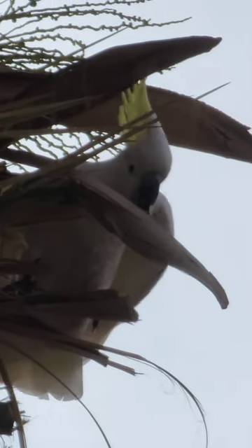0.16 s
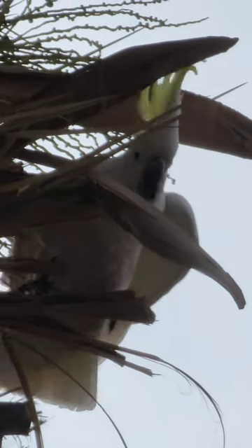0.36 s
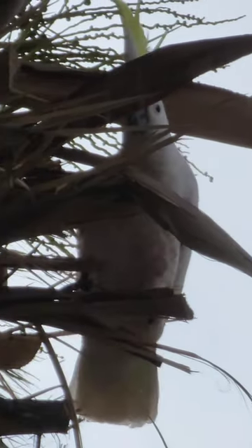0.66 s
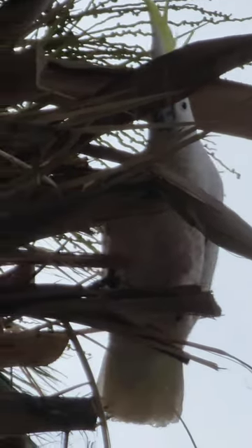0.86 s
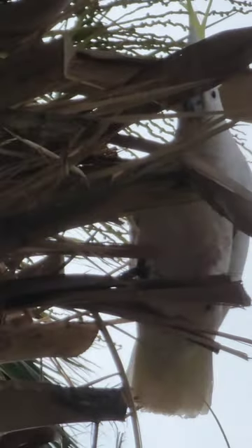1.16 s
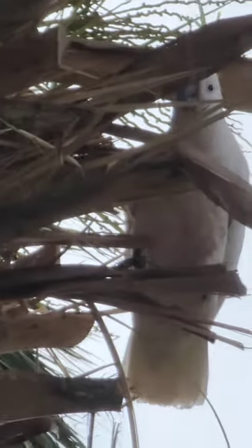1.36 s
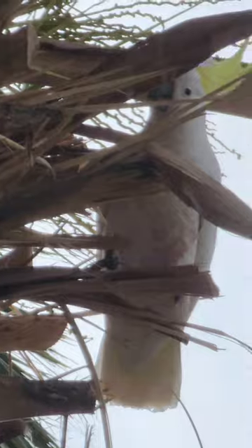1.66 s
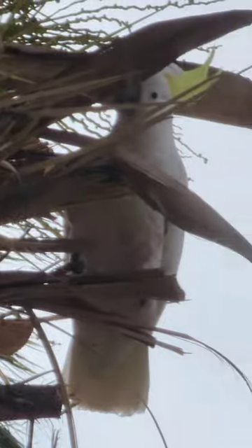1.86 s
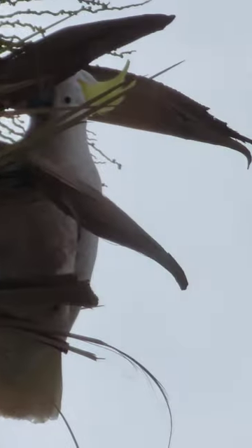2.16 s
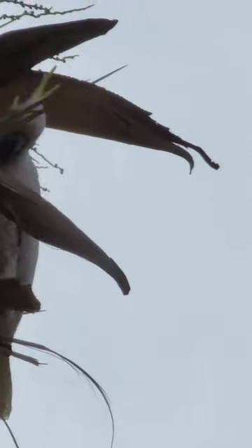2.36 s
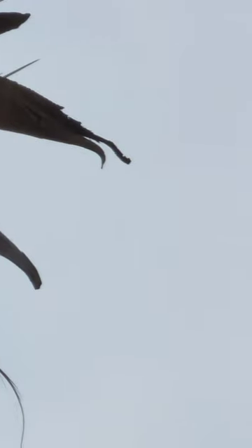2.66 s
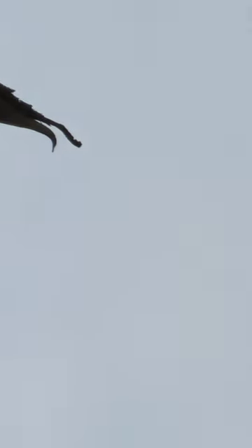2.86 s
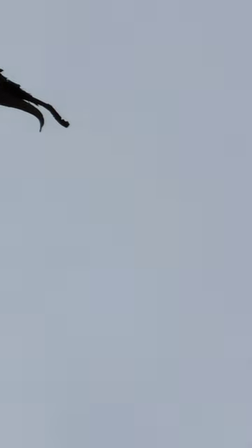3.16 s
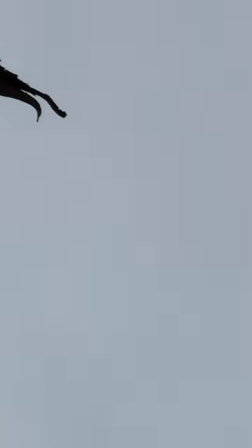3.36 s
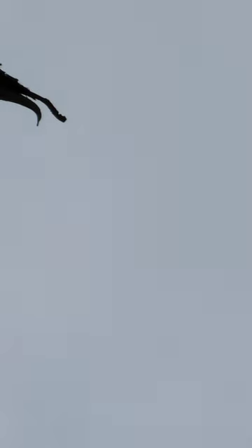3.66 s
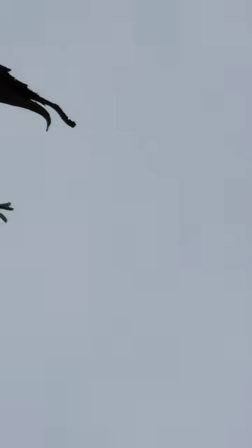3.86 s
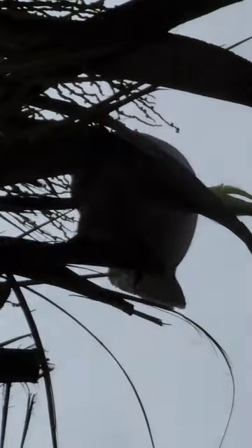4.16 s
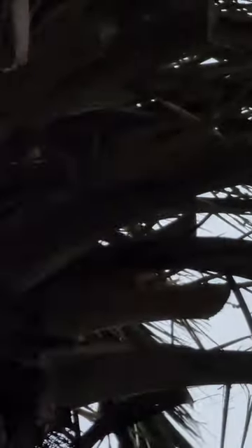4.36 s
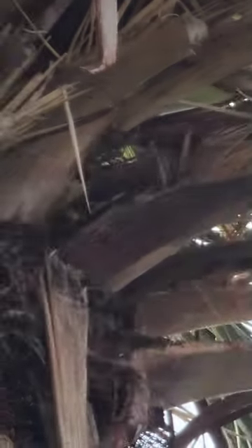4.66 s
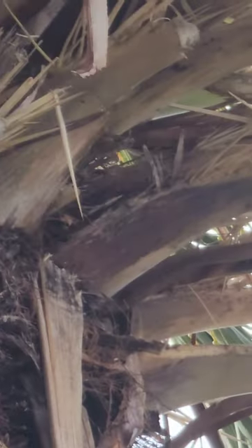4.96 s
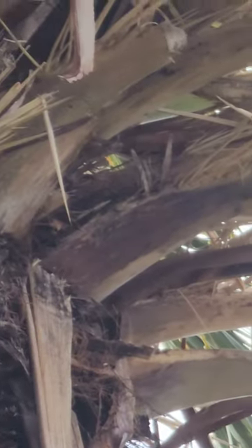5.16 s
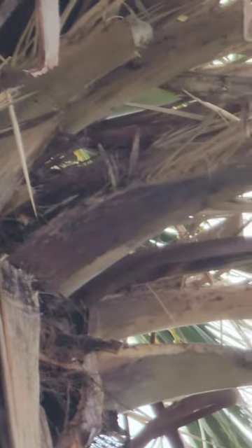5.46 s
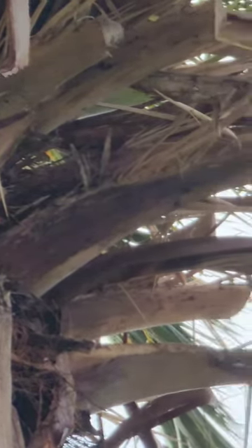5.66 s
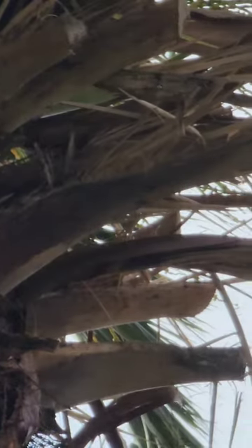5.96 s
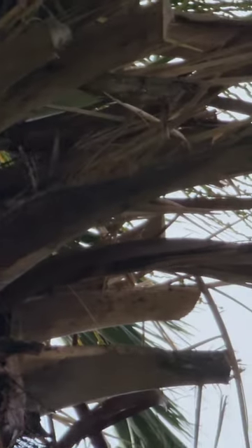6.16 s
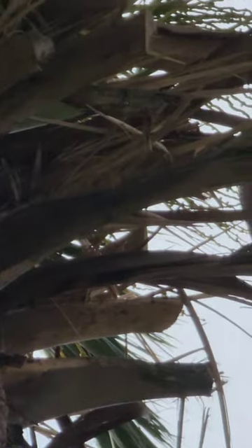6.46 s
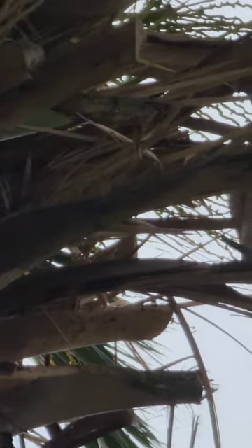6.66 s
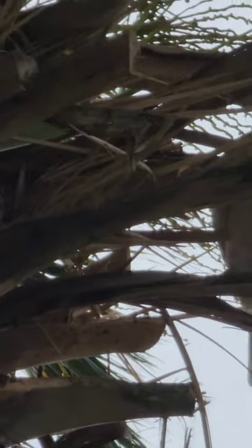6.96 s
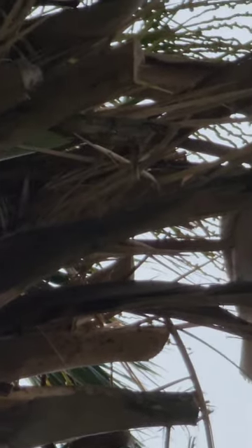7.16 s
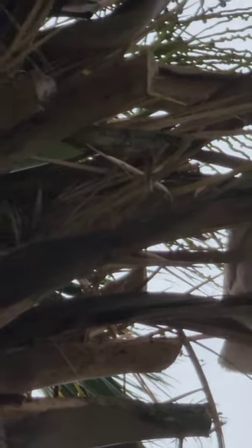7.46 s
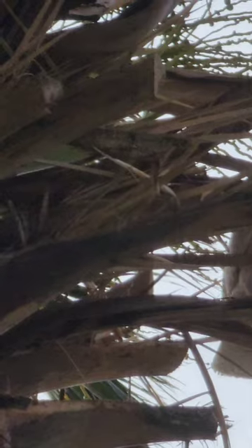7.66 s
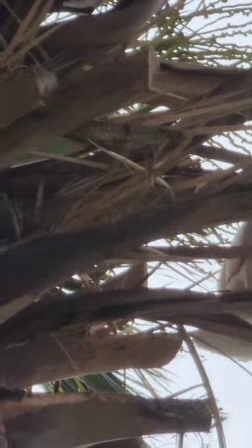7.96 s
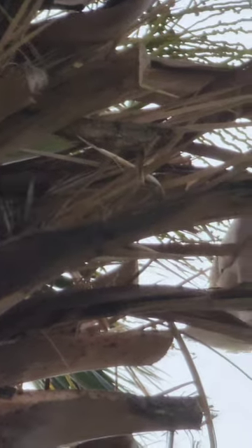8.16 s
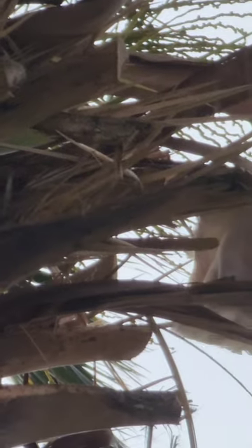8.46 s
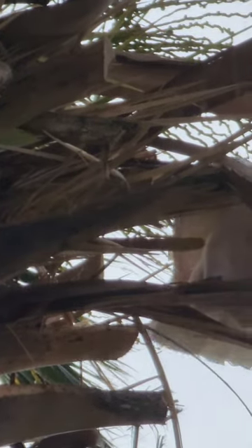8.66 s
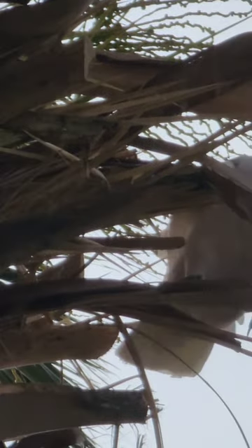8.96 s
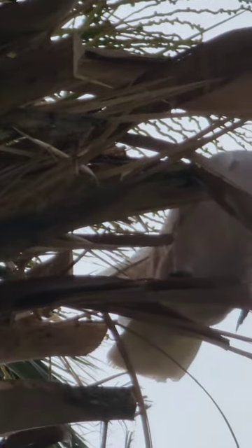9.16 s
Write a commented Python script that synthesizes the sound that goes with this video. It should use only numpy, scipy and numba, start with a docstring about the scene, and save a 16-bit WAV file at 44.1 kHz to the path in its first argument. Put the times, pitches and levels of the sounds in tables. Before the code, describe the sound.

Outdoors under a palm, a soft low rumble and faint hiss of distant traffic runs throughout. A close cockatoo screams immediately, 0.0-0.6 s: harsh, torn and piercing, around 1.1 kHz with strong bright overtones, breaking briefly into a steadier squeal. A second cockatoo answers further off at 0.6-1.1 s, duller and quieter, with a very faint tail call until 1.6. After a lull with tiny frond rustles, near screeches come at 2.6-3.1, 3.6-4.1 (slightly lower and smoother, ending in a squeal) and 4.4-5.0 s. A small falling chirp sounds near 3.3, a distant screech at 4.1-4.5. Then mostly quiet traffic, with faint whistles, weak distant calls and a dry rustle around 6.3-7.2. The near bird screams again at 7.2-7.8; the far one replies at 7.9-8.5, and a final rough scream fills 8.5-9.1. Short frond echoes and a light outdoor tail follow each call.

```python
"""In the crown of a palm a cockatoo screeches six times, close to the microphone.
Its syrinx swings near 1.1 kHz, now as a steadier squeal, mostly in chaos, and rings the throat and open beak.
A second cockatoo answers from further off, other birds whistle faintly and dry fronds brush.
Distant traffic rumbles; filtered noise and a low drone carry it. Echoes return from fronds and surroundings."""
import sys
import numpy as np
from scipy import signal
from scipy.fft import rfft, irfft, next_fast_len
from scipy.io import wavfile
from scipy.ndimage import uniform_filter1d
from numba import njit

SR = 44100
rng = np.random.default_rng(int(sys.argv[2]) if len(sys.argv) > 2 else 0)


def generate_wav(signal):
    """Clip the signal to [-1, 1] and save it as 16-bit WAV at the path in sys.argv[1]."""
    frames = np.transpose(np.atleast_2d(signal))
    scaled = np.clip(frames, -1, 1) * 32767
    pcm = np.round(scaled).astype(np.int16)
    wavfile.write(sys.argv[1], SR, pcm)


N = 411012
TOP_HZ = 15400  # upper limit of the recorded band

# Near calls. Each row: start, end, attack and release in seconds, relative level in dB, first and top pitch
# in Hz, climb in seconds, roughness (0 clean, 1 full chaos), first and last beak resonance in Hz,
# relative level of the fundamental in dB, relative level of the treble above 4 kHz in dB.
SCREECHES = [ (0.042, 0.632, .08, 0.088, -10.5, 870, 1128, 0.19, .92, 2150, 2580, -18.5, -8.5),
             (2.577, 3.078, 0.14, 0.043, -13, 830, 1079, .12, 1.25, 1870, 2415, -15.5, -10),
             (3.602, 4.138, 0.16, .14, -12, 794.5, 1001, .3, .6, 1720, 2000, -18.5, -10),
             (4.428, 5.015, 0.03, 0.072, -10.5, 986, 1104, .16, .9, 2083, 2690, -17, -7.5),
             (7.191, 7.785, 0.067, .045, -10, 1043, 1153, .28, 0.77, 2060, 2550, -17, -9),
             (8.478, 9.101, 0.03, .055, -11, 965, 1146, .17, 1, 2180, 2650, -17, -7)]
# How tongue and beak are held in each screech. Each row: lower resonance in Hz and its strength in dB,
# upper resonance in Hz and its strength in dB, sizzle above 9 kHz in dB.
POSTURES = [(1470, -12.5, 5550, 2.5, 5), (1577, 3, 4930, 5, 2), (2910, -1.5, 4600, 6.5, 7.5),
            (1580, -9.5, 5560, 4, 6.5), (1556, 10.5, 4770, 0, 1), (1400, 4, 9800, 0, 4)]
SAG_HZ_PER_S = 1000  # the pitch drops as the breath runs out
ONSET_ROUGH = 0.67  # share of the roughness that is there before the pitch has climbed
TREBLE_DB_PER_OCTAVE, TREBLE_OPENING_DB = 16.5, 2.5  # brighter with pitch, and as the beak opens
FUNDAMENTAL_ONSET_DB, FUNDAMENTAL_RISE_S = -7.5, 0.12  # the fundamental builds up after the onset
FUNDAMENTAL_FLICKER_DB, LEVEL_FLICKER_DB = 2.5, 1.3  # rms
SQUEAL_DB, SQUEAL_FUNDAMENTAL_DB, SQUEAL_TREBLE_DB = 3.5, 5, -4.5  # louder and rounder than the chaos


def near_cockatoo(gain_db=0.35):
    """Source and filter: the driven pitch climbs, holds and sags while the opening beak retunes the tract."""
    out = np.zeros(N)
    for screech, posture in zip(SCREECHES, POSTURES):
        start, end, attack_s, release_s, db, first_hz, top_hz, climb_s, rough = screech[:9]
        beak_first_hz, beak_last_hz, low_db, treble_db = screech[9:]
        i = span(start, end)
        t = i / SR
        age = t - start
        climb = ramp(age / climb_s)
        opening = age / (end - start)

        sag_hz = SAG_HZ_PER_S * np.maximum(t - (end - release_s), 0)
        hz = first_hz + (top_hz - first_hz) * climb - sag_hz
        beak_hz = beak_first_hz + (beak_last_hz - beak_first_hz) * opening
        treble_db = treble_db + TREBLE_DB_PER_OCTAVE * np.log2(hz / top_hz)
        treble_db = treble_db + TREBLE_OPENING_DB * (opening - 0.5)
        low_db = low_db + FUNDAMENTAL_ONSET_DB * (1 - ramp(age / FUNDAMENTAL_RISE_S))

        rough = rough * (ONSET_ROUGH + (1 - ONSET_ROUGH) * climb)
        hz, rough, locked = syrinx_lock(t, hz, rough)
        low_flicker_db = FUNDAMENTAL_FLICKER_DB * (1 - locked) * flutter(len(i), 4.3, 22)
        low_db = low_db + SQUEAL_FUNDAMENTAL_DB * locked + low_flicker_db
        treble_db = treble_db + SQUEAL_TREBLE_DB * locked
        db = db + gain_db + SQUEAL_DB * locked + LEVEL_FLICKER_DB * flutter(len(i), 9.8, 20)

        call = voice(syrinx(hz, rough), posture, low_db, treble_db, beak_hz)
        out[i] += sizzle(call, age) * undb(db) * envelope(t, start, end, attack_s, release_s)
    return out


# Moments of steadier squeal, some still rough. Each row: start and end in seconds, roughness,
# pitch ratio (near 1 keeps the register, well below 1 drops it).
SQUEALS = [(0.123, 0.235, .05, 0.77), (3.972, 4.15, 0.18, 0.97), (4.524, 4.616, .05, 0.98),
           (7.15, 7.235, 0.63, .78), (7.295, 7.377, 0.42, 1), (7.716, 7.755, 0.22, .53),
           (8.562, 8.644, 0.1, 0.97)]
LOCK_S, BREAK_S = 0.035, 0.008  # a squeal settles slowly and breaks at once


def syrinx_lock(t, hz, rough):
    """Mode locking: the chaotic syrinx locks into a squeal and breaks loose; also gives how firmly it locks."""
    locked = np.zeros(len(t))
    for start, end, squeal_rough, ratio in SQUEALS:
        lock = envelope(t, start, end, LOCK_S, BREAK_S)
        hz = np.where(lock > 0.5, hz * ratio, hz)
        rough = rough + lock * (squeal_rough - rough)
        locked = locked + lock
    return hz, rough, locked


def syrinx(hz, rough, slip=0.054, shimmer=0.38, drift=0.02904, waver=0.01974, rasp_db=-13, odd_db=2,
           third_db=-4, fickle=0.29, beat_hz=450, beat_slip=0.086, beat_depth=0.59):
    """Chaotic oscillation: membranes clap once a cycle; in chaos early or late, strong or weak."""
    n = len(hz)
    # the chaos comes in fits, with moments of near order between them
    rough = rough * np.exp(fickle * flutter(n, 10.56, 54.9))
    # a second, slower swing of the membranes wanders in rate and throws broken sidebands
    beat = 2 * np.pi * np.cumsum(beat_hz * np.exp(0.45 * flutter(n, 5, 22))) / SR
    # a slow flapping tears each partial into strands
    flap = 2 * np.pi * np.cumsum(170 * np.exp(0.35 * flutter(n, 5, 18))) / SR
    wander = waver * flutter(n, 6, 20) + drift * flutter(n, 20.37, 130.8)
    turns = np.cumsum(hz * (1 + (rough + 0.05) * wander)) / SR
    jitter = slip * flutter(n, 70, 439) + beat_slip * np.sin(beat) + 0.056 * np.sin(flap)
    turns = turns + rough * jitter
    # the third harmonic is weak; above it the odd ones stand out
    harmonics_db = [0, 0, third_db] + [-odd_db, odd_db] * 5
    claps = sum(undb(db) * np.cos(2 * np.pi * k * turns) for k, db in enumerate(harmonics_db, 1))
    # air tears through the gap while it is open
    rasp = unit(rng.standard_normal(n) * (1 + 0.42 * np.cos(2 * np.pi * turns)))
    unevenness = shimmer * flutter(n, 83, 880) + beat_depth * np.cos(beat)
    strength = np.exp(np.minimum(rough, 1) * unevenness)
    return strength * (unit(claps) + undb(rasp_db) * (rough + 0.06) * rasp)


# Response of the throat. Each row: frequency in Hz, gain in dB.
THROAT = [(450, -21), (800, -15), (1100, -11.5), (1350, -9), (1800, -4.5), (2250, -2.5), (2700, -2),
          (3150, 4.5), (3800, -4), (4900, -8.5), (6300, -14), (7700, -15), (9800, -32), (12000, -27.5),
          (15000, -32)]


def voice(source, posture, low_db, treble_db, beak_hz):
    """Formant filtering: throat, tongue and beak ring; effort shifts weight from fundamental to treble."""
    low_hz, low_peak_db, high_hz, high_peak_db, sizzle_db = posture
    throat = colour(source, THROAT)
    fundamental = cut(throat, 1350, "low", order=8)
    body = cut(throat, [1350, 4000], "band", order=8)
    treble = cut(throat, 4000, "high", order=8)
    body = boost(body, low_hz, width_hz=190, db=low_peak_db)
    body = boost(body, beak_hz, width_hz=550, db=17.5)
    treble = boost(treble, high_hz, width_hz=83, db=high_peak_db)
    treble = colour(treble, [(8000, 0.0066), (11000, sizzle_db)])
    # each band is levelled first, so that the gains alone set the balance
    weighted_low = undb(low_db + 2.4) * steady(fundamental)
    weighted_treble = undb(treble_db + 0.94) * steady(treble)
    return steady(steady(body) + weighted_low + weighted_treble)


def sizzle(call, age, onset_db=-7, rise_s=0.38):
    """Delayed turbulence: the hiss above 9 kHz is held back at the start and builds up after the voice."""
    hiss = colour(call, [(8000, -60), (9500, 0)])
    hiss_gain = undb(onset_db * (1 - ramp(age / rise_s)))
    return call + hiss * (hiss_gain - 1)


def echo(x, delay_s=0.00605, db=-9, top_hz=5500):
    """Specular reflection: one dull copy from a surface a metre behind the microphone."""
    lag = int(delay_s * SR)
    return x + undb(db) * cut(np.pad(x, (lag, 0))[:N], top_hz, "low", order=1)


def glints(x, db=-6, nearest_s=0.001071, farthest_s=0.0022, sway=0.075):
    """Comb interference: leaf bases beside the bird reflect it; the short paths change as it moves its head."""
    i = np.arange(N)
    paths = []
    for delay_s in np.linspace(nearest_s, farthest_s, 4):
        paths.append(np.interp(i - delay_s * SR * (1 + sway * walk(2)), i, x))
    at_ports = np.array([paths[0] - paths[3], paths[2] - paths[1]])
    return undb(db) * cut(at_ports, 5100, "high")


# Far calls. Each row: start, end, attack and release in seconds, relative level in dB,
# first and last pitch in Hz, first and last roughness.
ANSWERS = [ (-.05, .12, .04, 0.092, -24.5, 1070, 1075, 0.68, 1.1),
           (0.599, 1.142, 0.12, 0.22, -21, 1090, 1111, 1.1, .9),
           (1.078, 1.615, 0.083, 0.39, -35.5, 993, 1113, .45, 0.49),
           (4.095, 4.48, 0.066, 0.02, -23, 1062, 1113, 1.4, 1.7),
           (6.359, 6.601, 0.11, 0.11, -32, 720, 793, .8, 1.2),
           (6.921, 7.229, .1, .04, -32, 927, 739, 0.54, 0.54),
           (7.93, 8.161, 0.18, 0.051, -27.5, 976, 1099, .4, 0.35),
           (8.093, 8.52, .11, 0.02, -21.5, 1101, 1087, 0.88, 1)]


def far_cockatoo(gain_db=-3.5, flicker_db=1.5):
    """Air absorption dulls the same kind of voice further off; its beak opens wider as the call gets rougher."""
    out = np.zeros(N)
    for start, end, attack_s, release_s, db, first_hz, last_hz, first_rough, last_rough in ANSWERS:
        i = span(start, end)
        hz = np.linspace(first_hz, last_hz, len(i))
        rough = np.linspace(first_rough, last_rough, len(i))
        beak_hz = 2100 + 650 * np.minimum(rough, 1)
        call = voice(syrinx(hz, rough), POSTURES[0], low_db=-24.0, treble_db=-12.0, beak_hz=beak_hz)
        level = undb(db + gain_db + flicker_db * flutter(len(i), 7.7, 22))
        out[i] += call * level * envelope(i / SR, start, end, attack_s, release_s)
    return colour(out, [(600, 13), (2200, 2.5), (2800, -2.5), (4000, 2), (6000, -3), (9000, -4.5), (14000, -9)])


# Faint clear notes; those near 3.3 s are partials of one falling call. Each row: start and end in seconds,
# first, middle and last pitch in Hz, level in dB, loss per harmonic in dB.
WHISTLES = [ (1.005, 1.38, 1335, 1330, 1296, -48.5, 18), (1.953, 2.32, 4370, 4260, 4260, -65.5, 49),
            (2.416, 2.523, 5200, 5500, 5670, -56, 39), (3.24, 3.39, 1507, 1470, 1245, -41, 40),
            (3.257, 3.395, 790, 747, 626, -46.5, 37), (3.272, 3.488, 5450, 5280, 5090, -56, 44),
            (3.319, 3.429, 3100, 3002, 2890, -38.5, 28), (3.324, 3.496, 3890, 3810, 3560, -55, 42),
            (6.368, 6.48, 1386, 1476, 1490, -46, 22), (6.639, 6.766, 2910, 3058, 2964, -34, 29),
            (6.686, 6.799, 2400, 2090, 1620, -37, 48), (6.738, 7.007, 1399, 1340, 1356, -38, 5.5)]


def other_birds(waver=0.016):
    """Harmonic synthesis: gliding, nearly pure notes follow a parabola in pitch, with a few harmonics."""
    out = np.zeros(N)
    for start, end, first_hz, middle_hz, last_hz, db, loss_db in WHISTLES:
        i = span(start, end)
        arch = np.polyfit([0, 0.5, 1], [first_hz, middle_hz, last_hz], 2)
        hz = np.polyval(arch, np.linspace(0, 1, len(i)))
        turns = np.cumsum(hz * (1 + waver * flutter(len(i), 28, 260))) / SR
        note = np.zeros(len(i))
        for k in range(1, 6):
            if k * middle_hz < TOP_HZ:
                note += undb(-loss_db * (k - 1)) * np.sin(2 * np.pi * k * turns)
        out[i] += unit(note) * undb(db) * signal.windows.tukey(len(i), 0.7)
    return out


# Dry fronds brushing. Each row: start in seconds, peak level in dB, twice the time to the peak in seconds.
RUSTLES = [(2.049, -53.5, 0.033), (2.3, -51.5, 0.028), (2.46, -50, 0.21), (6.27, -52.5, 0.059),
           (6.62, -48, 0.13)]


def rustles():
    """Friction noise: short grainy hisses of dry palm leaves."""
    t, swell = np.arange(N) / SR, np.zeros(N)
    for start, db, fade_s in RUSTLES:
        age = np.maximum(t - start, 0) / fade_s * 2
        swell += undb(db) * age * np.exp(1 - age)
    grains = np.exp(0.5 * flutter(N, 40, 430))
    return swell * unit(flutter(N, 2500, 5100) * grains)


# Level difference of the microphone ports. Each row: frequency in Hz, left minus right in dB.
PORT_BALANCE = [(1000, 1), (2200, 0.5), (3000, 5), (3800, -2), (5000, -8), (5700, -4), (6500, 2.5),
                (8500, 1.5), (10500, 0), (11600, -6), (14000, 3.5)]
# Phase difference of the ports. Each row: frequency in Hz, lead of the left in radians.
PORT_PHASE = [(500, 0.3), (1200, 0.16), (2200, .55), (2600, .6), (3200, -1.99), (3620, -1.5), (4100, -1.6),
              (5500, -1.37), (8000, -1.2), (14000, -1.58)]


def ports(x):
    """Diffraction: the microphone body shades and delays the direct sound differently at its two ports."""
    n = next_fast_len(N, True)
    # each port takes half of the difference
    half = undb(at_bins(PORT_BALANCE, n) / 2) * np.exp(0.5j * at_bins(PORT_PHASE, n))
    return irfft(rfft(x, n) * np.array([half, 1 / half]), n)[:, :N]


def scatter(x, delay_s, t60_s, top_hz):
    """Diffuse reverberation: dense echoes decay exponentially, different at each port."""
    t = np.arange(SR) / SR
    tails = cut(rng.standard_normal((2, SR)), top_hz, "low", order=1)
    tails = tails * (t > delay_s) * undb(-60 * t / t60_s)
    tails /= np.sqrt(np.sum(tails ** 2, axis=1, keepdims=True))
    return signal.fftconvolve(x[None], tails, axes=1)[:, :N]


# Spectrum of the roads. Each row: frequency in Hz, relative level in dB.
TRAFFIC = [(15, -13), (25, -4), (42, -7), (60, 3.5), (95, -9), (128, -3.5), (190, -17.5), (310, -19.5),
           (600, -29.5), (900, -24), (2000, -26.5), (2600, -38), (4000, -48.5), (5000, -59), (9000, -70.5),
           (15000, -70.5)]
# Stereo width of the roads. Each row: frequency in Hz, side minus mid in dB.
TRAFFIC_SIDE = [(40, -16.5), (130, -20), (260, -15), (500, -7.5), (1500, -1.5), (6000, 1.5)]


def traffic(level_db=-34, swell_db=-1.5, drone_hz=59, drone_db=-52.5):
    """Shaped noise: a hiss of tyres on distant roads over a throbbing engine rumble alike at both ports."""
    mid = colour(rng.standard_normal(N), TRAFFIC)
    side = colour(colour(rng.standard_normal(N), TRAFFIC), TRAFFIC_SIDE)
    swell = undb(level_db + swell_db * walk(7.6))
    roads = np.array([mid + side, mid - side]) / np.std(mid) * swell
    drone = unit(resonate(rng.standard_normal(N), np.full(N, float(drone_hz)), 8.5))
    return roads + drone * undb(drone_db)


def undb(db):
    """Logarithmic level: decibels to amplitude gain."""
    return 10 ** (np.asarray(db) / 20)


def unit(x):
    """Power normalisation: scale to rms 1."""
    return x / np.sqrt(np.mean(x ** 2) + 1e-18)


def steady(x, size=900):
    """Envelope flattening: scale to a running rms of 1 over size samples."""
    return x / np.sqrt(np.abs(uniform_filter1d(x ** 2, size)) + 1e-12)


def ramp(x):
    """Saturation: a share held between 0 and 1."""
    return np.clip(x, 0, 1)


def envelope(t, start, end, attack_s, release_s):
    """Amplitude envelope: linear attack, hold and release."""
    return ramp((t - start) / attack_s) * ramp((end - t) / release_s)


def span(start, end):
    """Sampling: the sample numbers between two times in seconds, within the scene."""
    return np.arange(max(int(start * SR), 0), min(int(end * SR), N))


def at_bins(points, n):
    """Log-frequency interpolation of (Hz, value) rows at the bins of an n-point transform."""
    hz, value = np.transpose(points)
    return np.interp(np.log(np.arange(n // 2 + 1) * SR / n + 1), np.log(hz), value)


def colour(x, points):
    """Spectral shaping: filter by (Hz, dB) rows without phase shift."""
    n = next_fast_len(len(x) + 2048, True)
    return irfft(rfft(x, n) * undb(at_bins(points, n)), n)[:len(x)]


def cut(x, hz, kind, order=2):
    """Band limiting: Butterworth low-, high- or band-pass."""
    sos = signal.butter(order, np.minimum(hz, SR / 2 - 1), kind, fs=SR, output="sos")
    return signal.sosfilt(sos, x)


def flutter(n, lo_hz, hi_hz):
    """Band-limited noise: random motion between two rates at least an octave apart, rms 1."""
    return unit(cut(rng.standard_normal(n), [lo_hz, max(hi_hz, 2 * lo_hz)], "band"))


def walk(rate):
    """Smoothed random steps: a swell over the whole scene with rate new values a second, spread near 1."""
    k = int(SR / rate)
    return uniform_filter1d(np.repeat(rng.standard_normal(N // k + 1), k), k)[:N]


@njit
def resonate(x, hz, width):
    """Damped resonance: a state-variable band-pass with a moving centre, width in Hz."""
    y, band, low = np.empty(len(x)), 0., 0.
    for i in range(len(x)):
        g, damping = np.tan(np.pi * hz[i] / SR), width / hz[i]
        v = (band + g * (x[i] - low)) / (1 + g * (g + damping))
        band, low, y[i] = 2 * v - band, low + 2 * g * v, damping * v
    return y


def boost(x, hz, width_hz, db):
    """Superposition: add a resonance, fixed or moving, to the sound."""
    return x + undb(db) * resonate(x, hz + np.zeros(len(x)), float(width_hz))


def scene():
    """Superposition of the birds, their echoes from fronds and surroundings, and the traffic."""
    near = echo(near_cockatoo())
    far = far_cockatoo()
    small = other_birds() + rustles()
    to_fronds = undb(-9) * near + undb(-3) * far + undb(-7) * small
    fronds = scatter(to_fronds, delay_s=0.002, t60_s=0.12, top_hz=13000)
    to_surroundings = undb(-15.5) * near + undb(-7.5) * far + undb(-4.0) * small
    surroundings = scatter(to_surroundings, delay_s=0.02, t60_s=0.53, top_hz=3000)
    direct = ports(near + undb(-2.0) * far + small)
    return direct + glints(near) + fronds + surroundings + traffic()


def record(dry, ceiling_db=-9.0):
    """Level compression: gain control holds down the screeches, peaks are rounded and the top is cut."""
    loudness = np.sqrt(np.abs(uniform_filter1d(np.mean(dry ** 2, axis=0), size=400)))
    held = dry / (1 + (loudness / undb(ceiling_db)) ** 8) ** (1 / 8)
    rounded = held / (1 + np.abs(held / 0.95) ** 6) ** (1 / 6)
    return signal.sosfilt(signal.ellip(12, 0.1, 80, TOP_HZ, fs=SR, output="sos"), rounded)


dry = scene()
out = record(dry)
generate_wav(out)
```